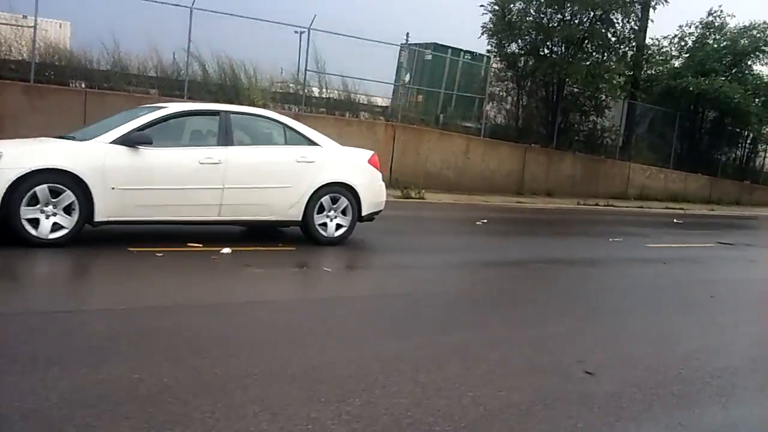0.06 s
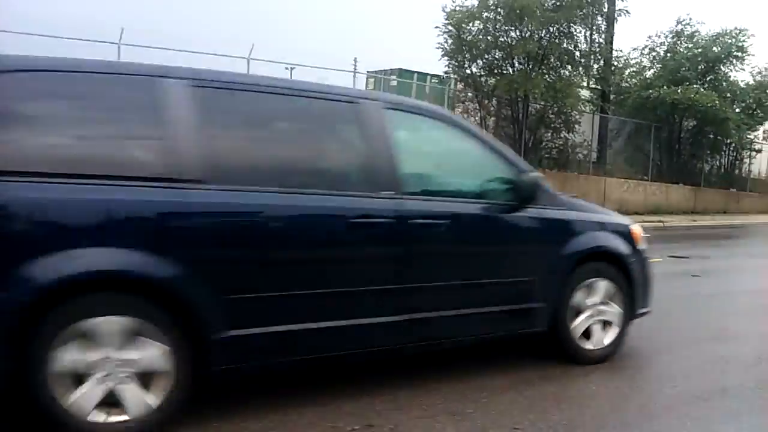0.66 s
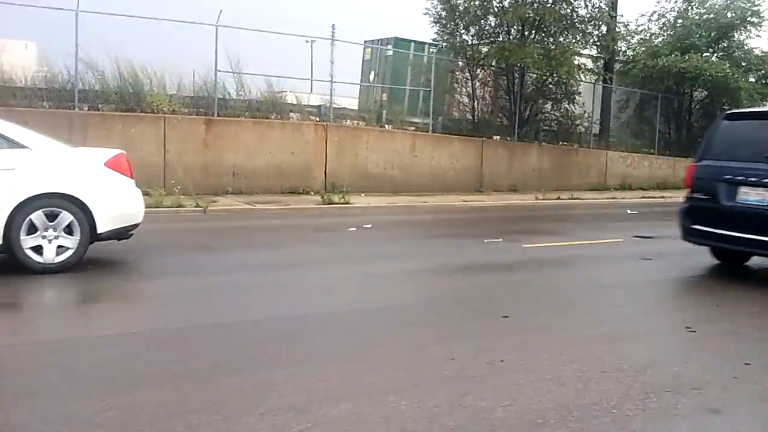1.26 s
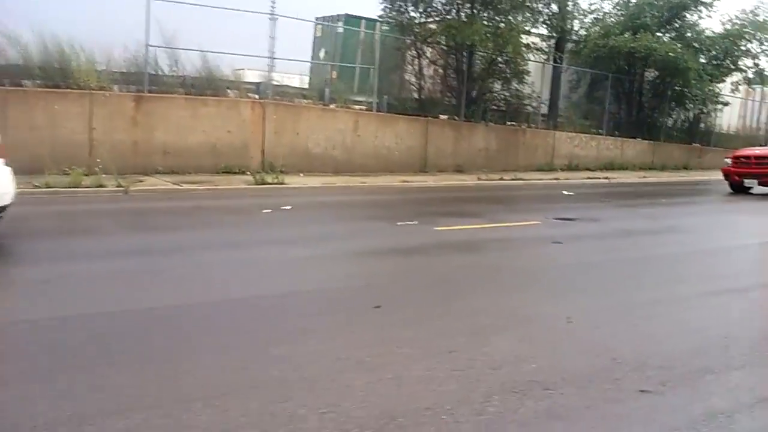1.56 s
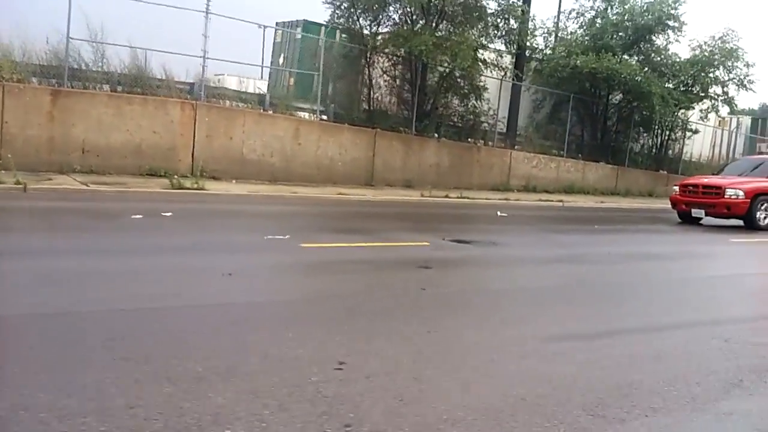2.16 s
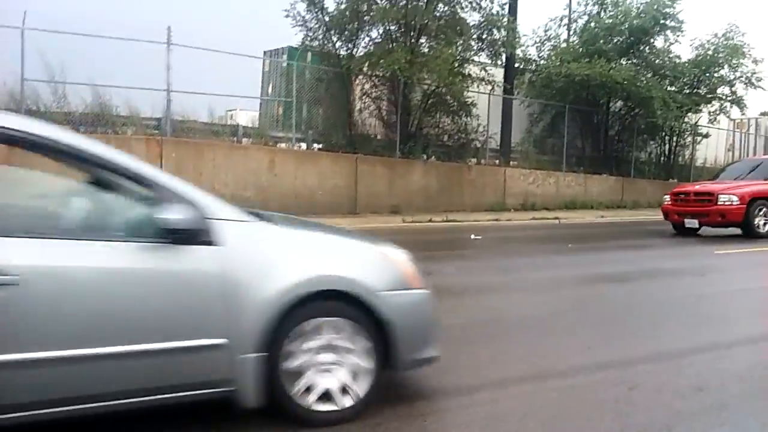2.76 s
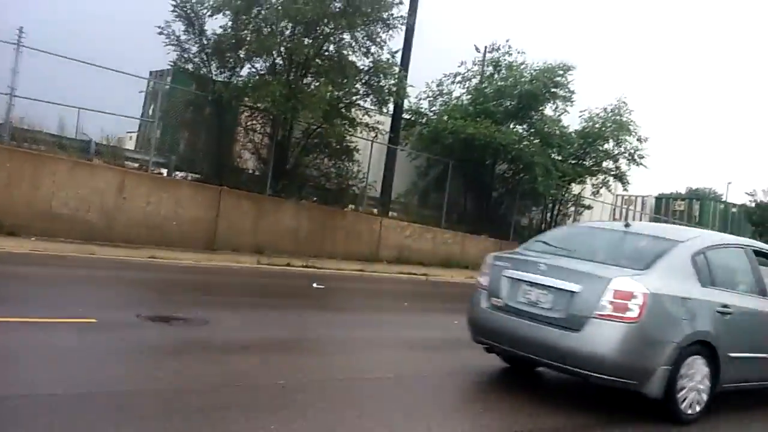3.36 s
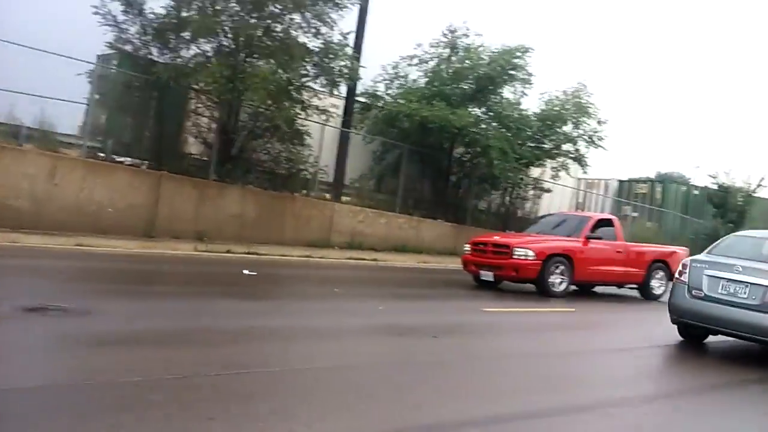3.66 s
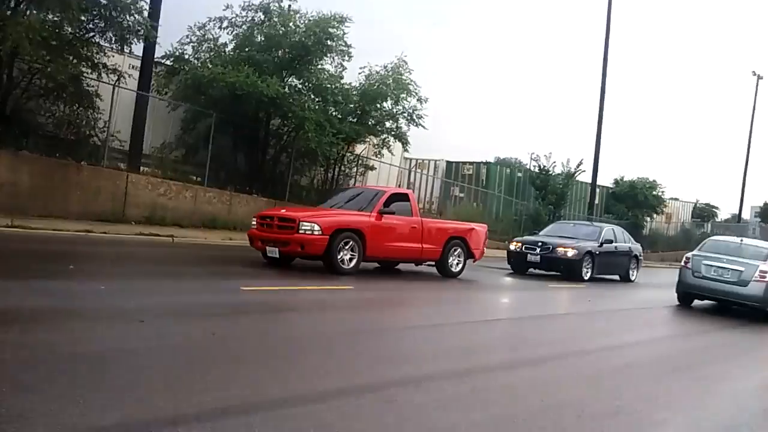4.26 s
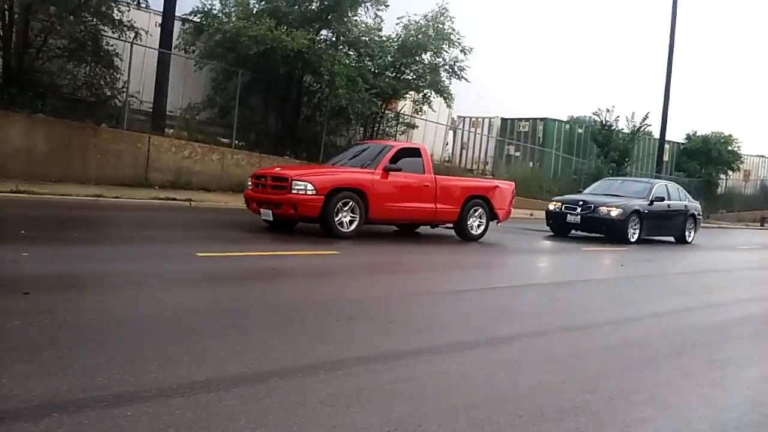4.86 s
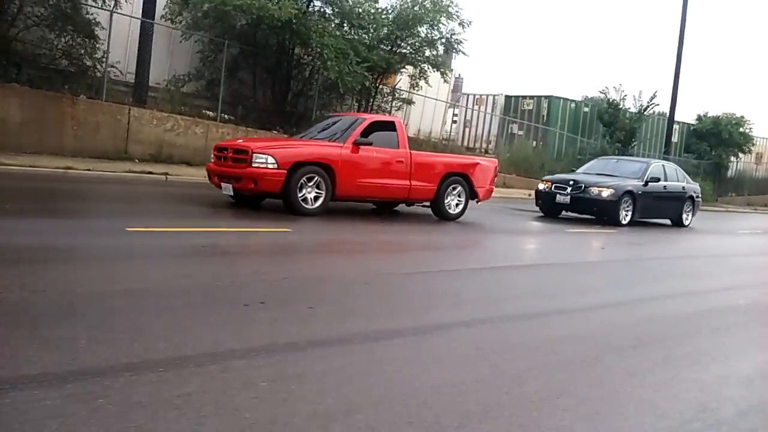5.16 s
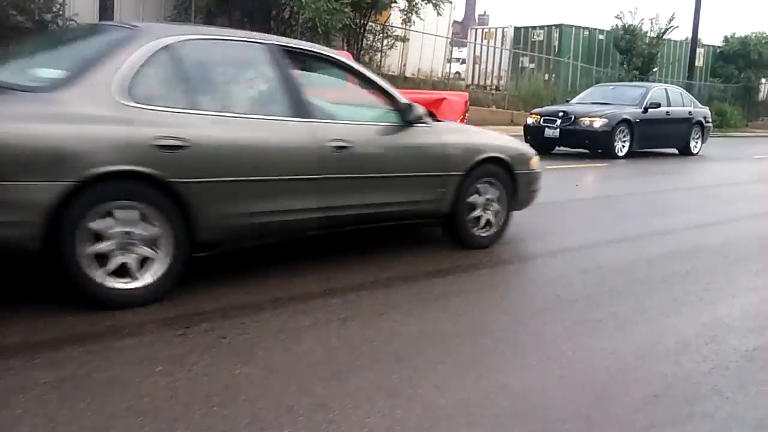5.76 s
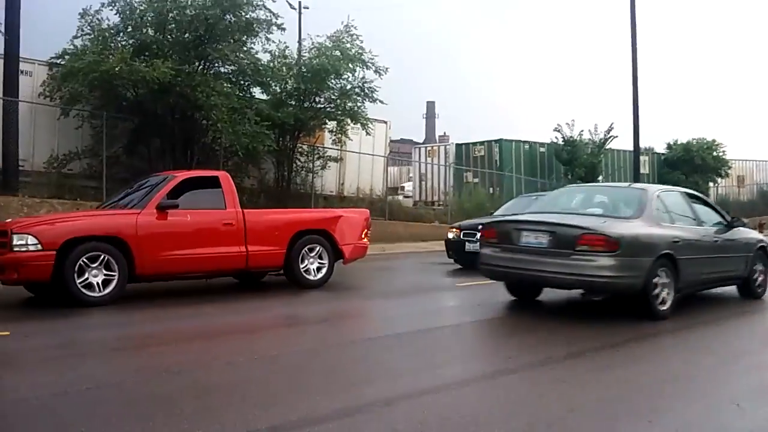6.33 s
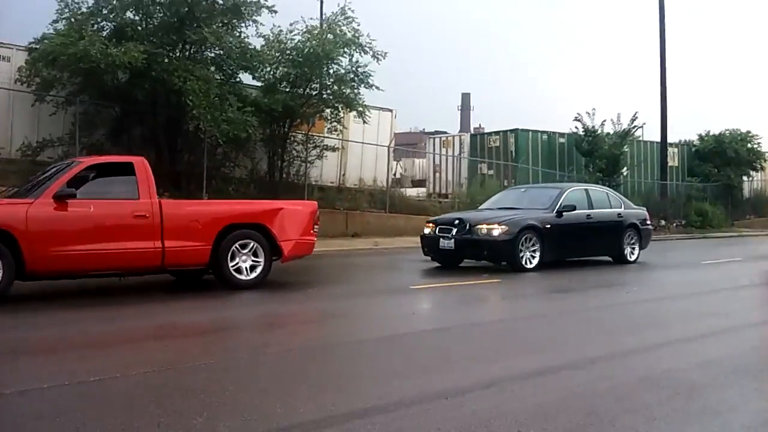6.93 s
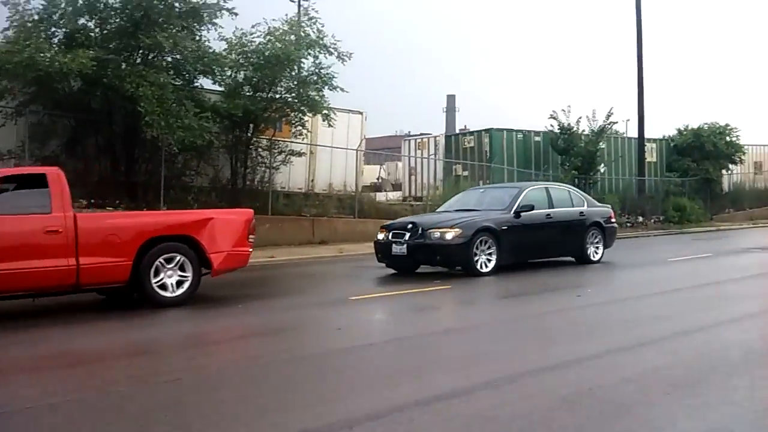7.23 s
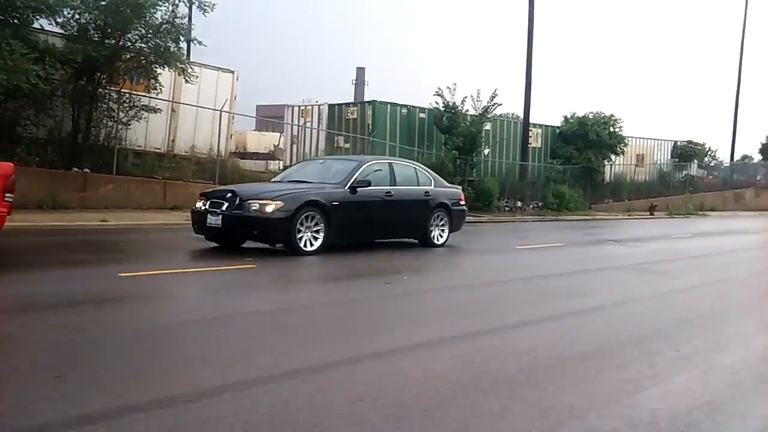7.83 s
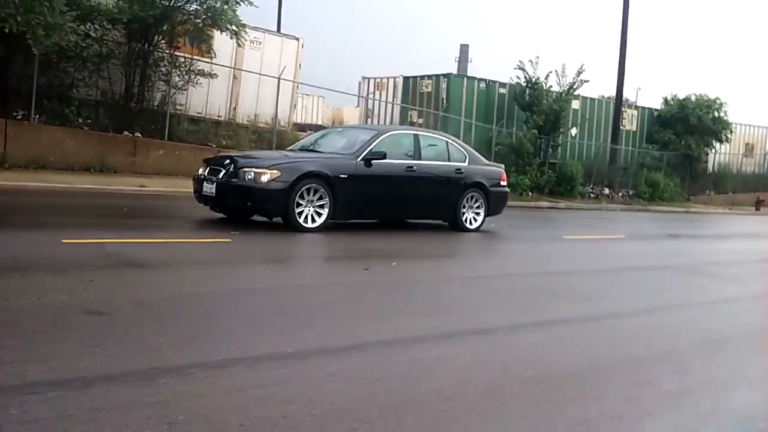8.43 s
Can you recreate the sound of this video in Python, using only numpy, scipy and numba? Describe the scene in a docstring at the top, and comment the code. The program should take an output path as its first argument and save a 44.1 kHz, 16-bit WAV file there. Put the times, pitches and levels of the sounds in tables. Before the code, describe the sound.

Cars drive along a wet city street, heard from the kerb, several passing close by. Their tyres swell and fade with a hiss of spray, a hum of tread and a low engine drone, with a few quick puddle slaps. Gusts of wind buffet the microphone with low rumbles and thumps, strongest in the first half. The traffic eases near the end as one more car approaches.

```python
"""Cars roll past on a wet city street, three of them close by, heard from the kerb in gusty wind.
Air pumped from their treads roars and rings in the grooves; the tyres throw hissing spray and
slap through puddles. Sound bouncing off the wet road cuts gliding notches into the passes.
Gusts buffet the microphone and now and then choke it for a few milliseconds."""
import sys
import numpy as np
from scipy import signal
from scipy.fft import rfft, irfft, next_fast_len
from scipy.io import wavfile
from scipy.ndimage import uniform_filter1d
from numba import njit

SR = 44100
rng = np.random.default_rng(int(sys.argv[2]) if len(sys.argv) > 2 else 0)


def inscribe(sig):
    """Save sig as 16-bit PCM at rate SR to the path in sys.argv[1].

    A 1-D sig is mono; a 2-D sig holds one channel per row.
    Samples are clipped to [-1, 1] before scaling.
    """
    pcm = np.round(np.clip(np.atleast_2d(sig).T, -1, 1) * 32767)
    wavfile.write(sys.argv[1], SR, pcm.astype(np.int16))


N = 383229
TIME_S = np.arange(N) / SR


def from_db(db):
    """Decibels to gain."""
    return 10 ** (np.asarray(db) / 20)


def unit_rms(x):
    """Scale to rms 1."""
    return x / np.sqrt(np.mean(x ** 2) + 1e-20)


def lowpass(x, hz, order=2):
    """Zero-phase low-pass."""
    return signal.sosfiltfilt(signal.butter(order, hz, fs=SR, output="sos"), x)


def drift(rate_hz):
    """Slow random curve, rms 1."""
    hop = 40
    pole = np.exp(-2 * np.pi * rate_hz * hop / SR)
    noise = rng.standard_normal(N // hop + 2002)
    slow = signal.lfilter([1], [1, -2 * pole, pole * pole], noise)[2000:]
    return np.interp(np.arange(N) / hop, np.arange(len(slow)), unit_rms(slow))


def coloured(x, spectrum):
    """Shape x to a spectrum, with steep skirts beyond its ends; rms 1."""
    hz, db = np.transpose(spectrum)
    size = next_fast_len(N)
    log_hz = np.log(np.maximum(np.arange(size // 2 + 1) * SR / size, 1))
    outside = np.abs(log_hz - np.clip(log_hz, np.log(hz[0]), np.log(hz[-1])))
    gain = from_db(np.interp(log_hz, np.log(hz), db) - 40 * outside)
    return unit_rms(irfft(rfft(x, size) * gain, size)[:N])


@njit
def resonator(x, hz, width_hz):
    """Two-pole band-pass, one centre frequency per sample."""
    r = np.exp(-np.pi * width_hz / SR)
    feedback = 2 * r * np.cos(2 * np.pi * hz / SR)
    y = np.zeros(len(x))
    for i in range(2, len(x)):
        y[i] = (1 - r * r) / 2 * (x[i] - x[i - 2]) + feedback[i] * y[i - 1] - r * r * y[i - 2]
    return y


def bandpass(x, hz, width_hz):
    """Two resonators in series, each width_hz wide; rms 1."""
    hz = hz * np.ones(len(x))
    return unit_rms(resonator(resonator(x, hz, width_hz), hz, width_hz))


# Light air between gusts: time_s, level_db
BREEZE = [(0, -21.5), (1.2, -22), (1.75, -44), (2.45, -35), (3.45, -22), (3.85, -51), (5.2, -36),
          (5.5, -66), (6.4, -38), (6.8, -51), (7.5, -25), (8.0, -42), (8.69, -42)]
# Gusts at the microphone: start_s, end_s, level_db, small_eddies_db
GUSTS = [(0.096, 0.203, -20.5, 5.5), (0.256, 0.425, -15, 0), (0.54, 0.571, -15.5, -0.5),
         (0.622, 0.802, -16, 4.5), (0.852, 0.885, -14, 4), (0.932, 1.245, -19.5, -13),
         (1.021, 1.087, -16, 0), (1.348, 1.46, -16.5, -0.5), (1.53, 1.565, -14, -4.5),
         (1.62, 1.672, -18.5, -4), (1.786, 1.962, -20, 0.5), (1.997, 2.104, -15.5, 3.5),
         (2.161, 2.249, -17, 2.5), (2.55, 2.703, -30.5, 15), (2.805, 2.906, -20, 3.5),
         (3.025, 3.475, -19, -0.5), (3.103, 3.212, -13, 0), (3.268, 3.383, -13.5, -2),
         (3.958, 4.05, -34.5, 6), (4.643, 4.806, -18.5, -9), (4.916, 5.256, -18, -8), (6.023, 6.4, -30, -3),
         (6.186, 6.192, -19.5, -0.5), (6.612, 6.657, -33, -13), (6.898, 6.913, -23.5, -20),
         (6.999, 7.096, -15.5, -6.5), (7.23, 7.47, -15, -10.5), (7.62, 7.663, -28.5, -4),
         (7.724, 7.796, -20, -13.5), (8.066, 8.286, -23.5, -10), (8.155, 8.23, -18.5, -13),
         (8.432, 8.462, -26, -22)]
FULL_GUST_DB = -15


def gusts(attack_s=0.02, release_s=0.04):
    """Gusts add to the breeze in power; returns buffeting level and small-eddy gain in dB."""
    power = from_db(np.interp(TIME_S, *np.transpose(BREEZE))) ** 2
    weighted_small_db = 0
    for start_s, end_s, level_db, small_db in GUSTS:
        fade = np.maximum(start_s - TIME_S, 0) / attack_s + np.maximum(TIME_S - end_s, 0) / release_s
        gust_power = (from_db(level_db) * np.exp(-np.minimum(fade, 20))) ** 2
        power += gust_power
        weighted_small_db += small_db * gust_power
    return 10 * np.log10(power), weighted_small_db / power


# Turbulence spectrum: freq_hz, density_db
BUFFET_SPECTRUM = [(22, -50), (32, -34), (42, -17.5), (60, -5.5), (130, 1), (250, 1.5), (400, -3.5),
                   (600, -11.5), (900, -19.5), (1500, -31), (3000, -48)]


def buffeting(gust_db, small_db):
    """Turbulence at the microphone port: fast air sheds small eddies, large ones rule in light air."""
    flow = coloured(rng.standard_normal(N), BUFFET_SPECTRUM)
    flow /= np.sqrt(uniform_filter1d(flow ** 2, size=1500) + 1e-9)   # flatten the slow level
    large = lowpass(flow, hz=99)
    small = flow - lowpass(flow, hz=271)
    middle = flow - large - small
    force_db = gust_db - FULL_GUST_DB
    small *= from_db(small_db + np.minimum(0.5 * force_db, 2.5) + 0.74 * drift(61))
    large *= from_db(-3.5 - 0.59 * force_db)
    lumps_db = 2.2 * drift(30)
    return from_db(gust_db + 0.23 + lumps_db) * (large + middle + small)


# Hardest single eddies: time_s, level_db, pitch_hz
EDDIES = [(0.348, -1.5, 300), (0.445, -8, 520), (0.539, -1.5, 270), (0.648, -4, 250), (0.653, -4.5, 420),
          (0.715, -5, 300), (0.763, -8, 332), (0.867, -0.5, 270), (0.886, -3, 300), (0.946, -4.5, 340),
          (1.039, -1, 280), (1.217, -5.5, 257), (1.389, -5, 324), (1.542, -4.5, 278), (1.880, -5, 377),
          (2.003, -3, 480), (2.051, -5, 330), (2.081, -3, 380), (2.190, -5.5, 470), (2.203, -2, 240),
          (2.213, -3.5, 238), (3.134, -5, 280), (3.165, -4, 480), (3.192, -6.5, 360), (3.309, -12, 273),
          (3.354, -1.5, 262), (4.541, -19.5, 163), (5.255, -7.5, 190.3), (6.191, -10, 253),
          (7.253, -9, 230), (7.295, -8.5, 209), (7.460, -9, 200), (7.801, -14, 169)]


def eddies(spread_cycles=0.45, crackle_decay_s=0.0088):
    """A swing or two of pressure at the port thumps, then breaks up; harder eddies crackle more."""
    out = np.zeros(N)
    crackle = bandpass(rng.standard_normal(N), hz=610, width_hz=490)
    crackle = unit_rms(lowpass(crackle, hz=950))
    for time_s, level_db, pitch_hz in EDDIES:
        near = np.abs(TIME_S - time_s) < 0.04
        age_s = TIME_S[near] - time_s
        cycles = age_s * pitch_hz
        thump = np.cos(2 * np.pi * (cycles + rng.random())) * np.exp(-(cycles / spread_cycles) ** 2 / 2)
        envelope = np.exp(-np.maximum(-6 * age_s, age_s) / crackle_decay_s)
        breakup = from_db(-12.5 + 0.5 * level_db) * envelope * crackle[near]
        out[near] += from_db(level_db) * (thump + breakup)
    return out


# Longest pinnings of the diaphragm: centre_s, length_s
LONG_CHOKES = [(.378, 0.006), (.434, 0.0037), (.588, 0.0033), (.930, 0.0023), (1.926, 0.0051),
               (1.988, 0.0036), (2.178, 0.005), (2.208, 0.0038), (3.079, 0.0054), (3.224, 0.0058),
               (5.056, 0.0038), (7.239, 0.0046), (7.694, 0.0067)]


def choke_gain(gust_db, full_gust_per_s=3.3, brief_s=0.0021):
    """Pinned by wind, the diaphragm passes almost nothing; strong gusts pin it more often."""
    rate_per_s = full_gust_per_s * from_db(gust_db - FULL_GUST_DB) ** 2
    brief_chokes = [(centre_s, brief_s) for centre_s in TIME_S[rng.random(N) < rate_per_s / SR]]
    gain = np.ones(N)
    for centre_s, length_s in list(LONG_CHOKES) + brief_chokes:
        distance = 2 * (TIME_S - centre_s) / length_s
        gain *= 1 - (1 - from_db(-55)) / (1 + distance ** 4)
    return gain


def droplets(per_s, spread_db):
    """Tiny impacts of uneven size on an equal bed of smooth hiss; rms 1."""
    sizes = from_db(spread_db * np.minimum(rng.exponential(1, N), 4)) * rng.choice([-1, 1], N)
    impacts = unit_rms(sizes * (rng.random(N) < per_s / SR))
    return unit_rms(impacts + rng.standard_normal(N))


# Tyres hitting puddles: peak_s, level_db, centre_hz, width_hz, length_s
SPLASHES = [(0.12, -23, 3180, 2230, 0.012), (0.156, -18.5, 1220, 900, 0.0087),
            (0.161, -21.5, 3520, 2790, 0.014), (0.207, -17.5, 2400, 2280, 0.02),
            (0.551, -28, 5670, 1840, 0.0044), (1.298, -20.5, 3600, 1400, 0.011),
            (1.326, -19, 3770, 2000, 0.01), (2.496, -29, 5800, 900, 0.012), (3.804, -24, 4200, 2100, 0.019),
            (5.128, -30.5, 5440, 810, 0.0067), (5.535, -23.5, 2600, 1000, 0.017),
            (6.084, -28, 3900, 1000, 0.071)]


def splashes():
    """Each puddle gives a quick slap of drops that dies away."""
    out = np.zeros(N)
    drops = droplets(per_s=1700, spread_db=-2)
    for peak_s, level_db, centre_hz, width_hz, length_s in SPLASHES:
        near = np.abs(TIME_S - peak_s) < 0.25
        age = (TIME_S[near] - peak_s) / length_s
        envelope = np.exp(-np.maximum(-3 * age, 0.7 * age))
        out[near] += from_db(level_db + 3) * envelope * bandpass(drops[near], centre_hz, width_hz)
    return lowpass(out, hz=6460)


def position(path, lag_s=0):
    """Place along the road, in units of the closest distance."""
    closest_s, approach_s, retreat_s = path
    age_s = TIME_S - closest_s - lag_s
    return age_s / np.where(age_s < 0, approach_s, retreat_s)


def nearness_db(path, lag_s=0):
    """Level falls with distance; 0 dB at the closest point."""
    return -15 * np.log10(1 + position(path, lag_s) ** 2)


def glide(path, share):
    """Pitch factor: 1 + share on approach, 1 - share on retreat."""
    place = position(path)
    return 1 - share * place / np.sqrt(1 + place ** 2)


def swells(rows, source, wander_share):
    """Bands of source swell and glide as a wheel passes, wavering with the uneven water film."""
    out = np.zeros(N)
    waver = 1 + wander_share * drift(12)
    for row, offset in zip(rows, rng.integers(0, N, len(rows))):
        *path, level_db, centre_hz, glide_share, width_hz = row
        place = position(path)
        near = np.abs(place) < 8
        envelope = from_db(level_db + nearness_db(path)) * (1 - (place / 8) ** 2)
        pitch_hz = centre_hz * glide(path, glide_share) * np.roll(waver, offset)
        band = np.roll(source, offset)[near]
        for _ in range(3):   # three wider passes: same width, steeper sides
            band = bandpass(band, pitch_hz[near], np.sqrt(3) * width_hz)
        out[near] += envelope[near] * band
    return out


# Wetter patches: peak_s, rise_s, fall_s, level_db, centre_hz, glide_share, width_hz
SPRAY_SURGES = [(0.05, 0.088, 0.59, -32.5, 3010, 0.13, 1300), (0.53, 0.026, 0.074, -31.5, 4250, 0.031, 700),
                (0.82, 0.078, 0.13, -31.5, 3930, 0.13, 1100), (1.0, 0.048, 0.15, -34, 4370, 0.055, 2180),
                (1.1, 0.15, 0.33, -44, 5190, 0.016, 900), (1.18, .08, .08, -60, 14500, 0, 3000),
                (1.62, 0.59, 0.24, -32, 3850, 0, 1100), (1.76, 0.15, 0.28, -42.5, 6200, 0.01, 1400),
                (2.07, 0.046, 0.11, -40.5, 6020, 0.045, 800), (2.44, 0.27, 0.1, -31, 3300, 0.15, 1000),
                (2.72, 0.48, 0.14, -34.5, 4420, 0, 704), (2.75, .1, .15, -62, 13200, 0, 3500),
                (2.93, 0.036, 0.22, -35, 4860, 0.023, 650), (2.96, 0.16, 0.3, -32, 3820, 0.041, 810),
                (3.46, .06, 0.04, -59.5, 14600, 0, 3000), (3.55, 0.22, 0.22, -53, 6800, 0.01, 1100),
                (3.95, 0.16, 0.27, -38, 2920, 0, 400), (4.0, 0.34, 0.25, -39, 4980, 0, 900),
                (4.07, 0.1, 0.18, -60, 13000, 0, 5500), (4.3, .15, 0.13, -68, 9400, 0.011, 4000),
                (4.85, 0.65, 0.46, -38, 4360, 0, 566), (5.25, 0.31, 0.33, -36, 3120, 0.0021, 700),
                (5.35, 0.067, 0.079, -40, 4900, 0, 800), (5.72, 0.069, 0.16, -30.5, 3940, 0.096, 754),
                (5.7, 0.16, 0.25, -47, 7100, 0, 1700), (5.8, 0.15, 0.19, -36.5, 4950, 0.041, 900),
                (5.88, 0.15, 0.47, -36.5, 2570, 0.11, 600), (6.11, 0.26, 0.15, -32.5, 3750, 0, 900),
                (6.2, 0.25, 0.11, -49, 7600, 0.034, 2600), (6.28, 0.27, 0.26, -56, 11700, 0, 4500),
                (6.5, 0.24, 0.33, -38, 3550, 0, 650), (6.85, 0.21, 0.2, -43, 4720, 0.014, 600),
                (7.17, 0.12, 0.19, -55.5, 13200, 0, 3800), (7.22, 0.46, .2, -41.5, 2940, 0.0046, 600),
                (7.45, 0.19, 0.6, -45.5, 4770, 0.033, 600), (7.8, .1, 0.17, -51, 2870, 0.025, 600),
                (7.72, 0.051, .2, -48, 5400, 0, 690), (8.25, .15, .1, -56, 4620, 0.0031, 450),
                (8.25, 0.084, 0.21, -50.5, 2930, .02, 400), (8.35, .03, 0.039, -51, 5450, 0.012, 700),
                (8.62, .04, 0.069, -43, 5380, 0.0085, 900), (8.65, 0.029, .1, -37.5, 4030, 0.03, 1100)]


def spray_surges():
    """The spray surges as a wheel crosses a wetter patch."""
    hiss = droplets(per_s=5000, spread_db=4) * from_db(2 * drift(33))
    return swells(SPRAY_SURGES, hiss, wander_share=0.018)


# Crests of the tread's roar and overtone: peak_s, rise_s, fall_s, level_db, centre_hz, glide_share, width_hz
TREAD_HUMS = [(0.74, 0.12, 0.19, -28, 1850, 0.024, 520), (1.04, .12, 0.17, -27, 1810, 0.0067, 328),
              (1.25, 0.37, 0.19, -32.5, 2170, -0.0032, 350), (1.3, .04, 0.081, -30, 1480, -0.014, 250),
              (1.62, 0.33, 0.61, -29, 1777, 0.042, 427), (2.66, 0.096, 0.12, -25, 994, 0.018, 322),
              (2.75, 0.076, 0.46, -31.5, 2170, -0.0084, 500), (3.0, 0.12, 0.082, -29.5, 1785, 0.022, 398),
              (3.22, 0.27, 0.12, -30.5, 1060, -0.017, 260), (2.15, .1, 0.23, -32.5, 1310, 0.0081, 350),
              (3.5, 0.19, 0.2, -28.5, 1730, 0.012, 335), (3.99, 0.26, 0.16, -32.5, 1880, -0.027, 342),
              (5.2, 0.62, 0.14, -35, 1694, 0.018, 378), (5.5, 0.19, 0.22, -27, 873, 0.054, 220),
              (5.78, 0.13, 0.12, -24.5, 955, 0.011, 160), (5.72, 0.27, 0.16, -39, 532, 0.034, 170),
              (6.15, 0.17, 0.34, -32, 944, 0.055, 170), (6.18, 0.13, 0.19, -34, 1936, 0.049, 330),
              (6.75, 0.089, 0.15, -34, 843, 0.058, 165), (7.35, 0.22, 0.57, -41, 854, 0.052, 171),
              (6.97, .1, 0.13, -41.5, 1520, 0.0068, 400), (7.55, 0.33, 0.43, -43, 1980, 0.046, 397),
              (8.12, .03, 0.061, -42, 1350, -0.0052, 450)]


def tread_hums():
    """The tread's roar and overtone crest now and then in gliding bands as the cars roll by."""
    grain = droplets(per_s=900, spread_db=3) * from_db(2.5 * drift(29))
    return swells(TREAD_HUMS, grain, wander_share=0.022)


# Fine-drop spectra, at the car and behind it: freq_hz, density_db
FIZZ_SPECTRUM = [(4500, 0.5), (6000, 7.5), (7000, -1), (8000, -4.5), (9200, -14), (11000, -28)]
MIST_SPECTRUM = [(7000, -13), (9300, -5.5), (11800, -3), (13500, -7.5), (15700, -6)]


def fine_drops(clouds):
    """The smallest drops fizz above each car's spray and thin out into mist behind it."""
    fizz_power = sum(from_db(db + nearness_db(path)) ** 2 for path, db in clouds)
    mist_power = sum(from_db(db - 8 + nearness_db(path, lag_s=0.13)) ** 2 for path, db in clouds)
    fizz = from_db(4 + 1.4 * drift(9.3)) * coloured(droplets(per_s=2600, spread_db=5.5), FIZZ_SPECTRUM)
    mist = from_db(drift(14)) * coloured(droplets(per_s=1500, spread_db=3), MIST_SPECTRUM)
    return np.sqrt(fizz_power) * fizz + np.sqrt(mist_power) * mist


# Engine and tyre-body spectrum: freq_hz, density_db
RUMBLE_SPECTRUM = [(30, -44), (55, -10), (100, -28), (200, 1.5), (320, -1.5), (480, 5), (680, 5),
                   (1000, -5), (1400, 3.5), (2500, -20)]


def rumble(path, level_db):
    """Engine and tyre bodies merge into a low drone."""
    gain = from_db(level_db - 3.5 + nearness_db(path) + drift(30))
    return gain * coloured(rng.standard_normal(N), RUMBLE_SPECTRUM)


# Tyre spray spectrum: freq_hz, density_db
SPRAY_SPECTRUM = [(700, -28), (1300, 5), (1800, -13), (2400, 8.5), (3200, 5), (4400, 0.5), (5500, -5.5),
                  (6400, -26.5), (7500, -21.5), (10000, -46)]


def spray(path, level_db):
    """Water flung off the tyres: a broad, fluttering hiss."""
    gain = from_db(level_db - 1.5 + nearness_db(path) + 2.7 * drift(27))
    return gain * coloured(droplets(per_s=5700, spread_db=6), SPRAY_SPECTRUM)


def tread(path, roar_db, overtone_db, groove_hz, overtone_hz):
    """Pumped air rings at the grooves' first two pipe resonances; the roar leads, the overtone trails."""
    shift = glide(path, share=0.017)
    roar_gain = from_db(roar_db + nearness_db(path, lag_s=-0.45) + 1.5 * drift(26))
    roar = bandpass(rng.standard_normal(N), groove_hz * shift, width_hz=450)
    overtone_gain = from_db(overtone_db + nearness_db(path, lag_s=0.071) + 0.9 * drift(27))
    overtone = bandpass(rng.standard_normal(N), overtone_hz * shift, width_hz=420)
    return roar_gain * roar + overtone_gain * overtone


def road_bounce(x, path, low_depth, high_depth):
    """Direct and reflected sound cancel at two pitches that glide as the car moves."""
    shift = glide(path, share=0.11)
    for notch_hz, width_hz, depth in (1305, 710, low_depth), (2624, 860, high_depth):
        x = x - min(depth, 0.95) * resonator(x, notch_hz * shift, width_hz)
    return x


# Dulling of the traffic's treble: time_s, loss_db
TREBLE_LOSS = [(4.42, -6.5), (4.65, 6), (4.73, 1), (5.05, 9.5), (5.28, 9), (5.42, 1.5), (5.8, 1), (6.6, -1),
               (6.95, 4.5), (7.3, 7), (7.65, 7), (7.73, 0), (7.95, 0), (8.3, 6), (8.36, -1), (8.52, 2.5),
               (8.6, -7.5)]


def treble_dips(x):
    """The treble sinks and recovers, at times brightening; the very top moves less."""
    loss_db = np.interp(TIME_S, *np.transpose(TREBLE_LOSS))
    low = lowpass(x, hz=6070, order=4)
    top = x - lowpass(x, hz=12000)
    return low + from_db(-loss_db) * (x - low - top) + from_db(-0.53 * loss_db) * top


# Passing cars: closest_s, approach_s, retreat_s, roar_db, overtone_db, spray_db, fine_drops_db,
# rumble_db, groove_hz, overtone_hz, low_notch_depth, high_notch_depth
CARS = [(0.10, 0.16, 0.38, -31.5, -32, -37.5, -57, -22.5, 875, 1700, 0, 0),
        (0.95, 0.37, 1.2, -28, -30.5, -26, -47.5, -24, 805, 1790, 0.94, 1),
        (2.851, 0.34, 0.95, -27, -36, -35.5, -49.5, -27, 947, 1830, 1, 0.2),
        (4.95, 0.26, 0.37, -40, -51, -30.5, -50, -33.5, 980, 1660, 0, 0.56),
        (5.92, 0.54, 0.84, -31, -46, -35, -50, -30, 820, 1940, .95, 1),
        (7.30, 0.53, 0.6, -43.5, -46, -47, -59.5, -35, 760, 1910, 0.4, 0.4),
        (8.78, 0.14, .4, -40, -39, -41, -57, -24, 770, 1760, 0.77, 0)]


def cars():
    """Each car brings tread noise, spray and rumble, notched by the road bounce, plus fine drops."""
    out, clouds = np.zeros(N), []
    for (*path, roar_db, overtone_db, spray_db, fine_drops_db, rumble_db,
         groove_hz, overtone_hz, low_notch_depth, high_notch_depth) in CARS:
        car = tread(path, roar_db, overtone_db, groove_hz, overtone_hz)
        car += spray(path, spray_db) + rumble(path, rumble_db)
        out += road_bounce(car, path, low_notch_depth, high_notch_depth)
        clouds.append((path, fine_drops_db))
    return out + fine_drops(clouds)


def scene():
    """Street and wind meet at one microphone; its choking cuts both."""
    gust_db, small_db = gusts()
    street = treble_dips(cars() + spray_surges() + tread_hums()) + splashes()
    wind = buffeting(gust_db, small_db) + eddies()
    return ((street + wind) * choke_gain(gust_db))[None]


def record(dry):
    """Low cut, soft peak limiting, steep top cut."""
    low_cut_hz, top_cut_hz = 40, 15750
    thin = signal.sosfilt(signal.butter(4, low_cut_hz, "high", fs=SR, output="sos"), dry)
    rounded = 0.95 * thin / (1 + thin ** 8) ** (1 / 8)
    return signal.sosfilt(signal.ellip(12, 0.1, 90, top_cut_hz, fs=SR, output="sos"), rounded)


dry = scene()
out = record(dry)
inscribe(out)
```